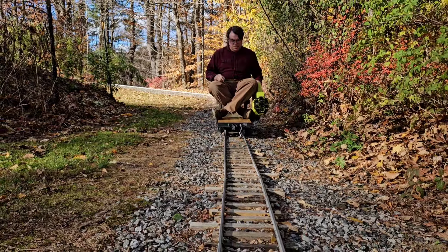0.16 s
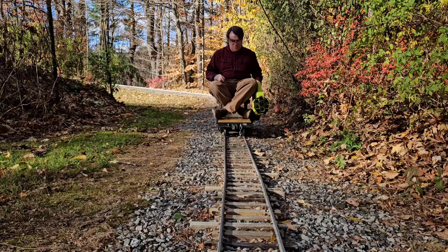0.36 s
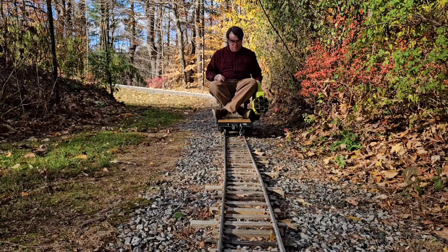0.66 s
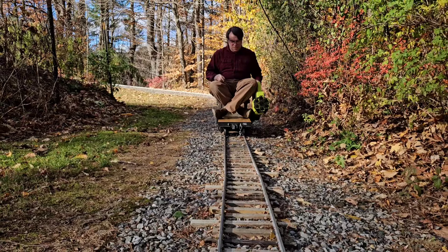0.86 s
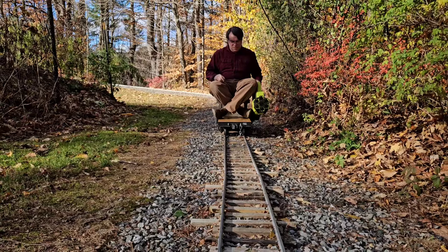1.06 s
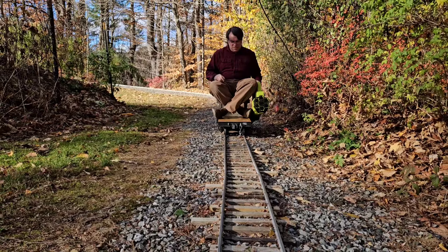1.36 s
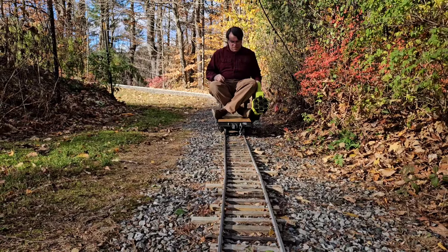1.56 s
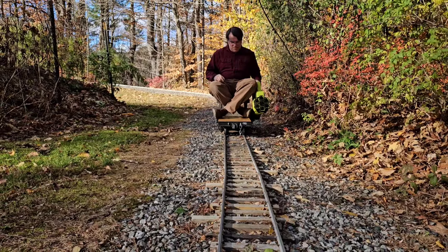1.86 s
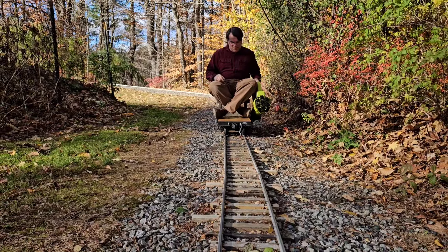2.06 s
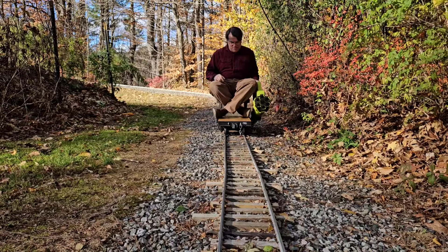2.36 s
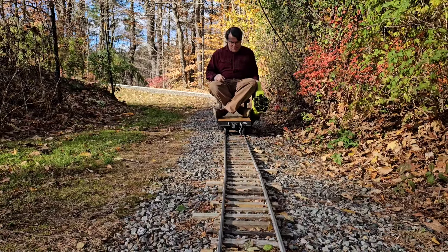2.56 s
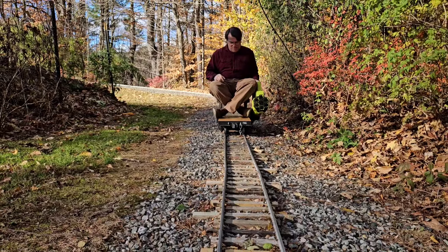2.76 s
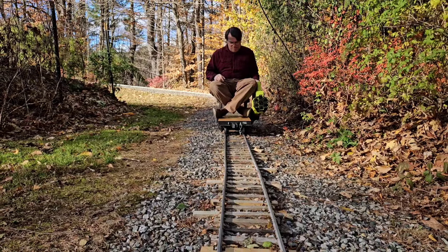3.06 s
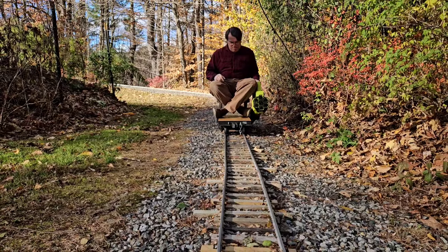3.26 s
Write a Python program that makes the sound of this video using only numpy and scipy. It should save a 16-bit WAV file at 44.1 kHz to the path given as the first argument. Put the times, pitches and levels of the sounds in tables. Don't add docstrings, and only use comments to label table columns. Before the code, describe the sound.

A battery leaf blower runs flat out from start to end, some metres away in open woods: a thin whine near 3.8 kHz, a hum near 345 Hz and broad rushing air. Light wind rumbles unevenly on the stereo microphone. Two wind pops hit the left near 1 s. From 2 to 2.4 s pitch sags slightly, air dulls, then recovers. A faint tick at 2.9 s precedes left-side thumps around 3 s; the blower continues to 3.4 s.

```python
import sys
import numpy as np
from scipy import signal
from scipy.fft import rfft, irfft
from scipy.io import wavfile
from scipy.ndimage import map_coordinates

SR = 44100
rng = np.random.default_rng(int(sys.argv[2]) if len(sys.argv) > 2 else 0)


def transcribe(signal):
    frames = np.atleast_2d(signal).T
    limited = np.clip(frames, -1, 1)
    pcm = np.round(limited * 32767).astype(np.int16)
    wavfile.write(sys.argv[1], SR, pcm)


def undo_db(level):
    steps = np.asarray(level, float) / 20
    return 10 ** steps


N = 149940
T = np.arange(N) / SR
F = np.arange(N // 2 + 1) * SR / N
SIDE = np.array([[1], [-1]])

# pitch_hz,
# level_db (per Hz)
AIR_SPECTRUM = [(140, -5), (260, -4.5), (340, 2), (450, 2), (500, -9.5), (640, -6.5), (740, -21),
                (930, -17),
                (1010, -9), (1300, -4.5), (1450, -10.5), (1900, -5), (2200, 0), (2500, -5), (3000, -6.5),
              (3650, -5.5),
                (4000, -9.5), (5200, -19), (7000, -23.5), (7500, -18), (7800, -23), (10000, -25),
              (11500, -23), (15500, -20.5)]
AIR_COLOUR = AIR_SPECTRUM
AIR_DB = -30


def level(x, db):
    return x * undo_db(db) / np.sqrt(np.mean(x ** 2))


def on_log(hz, table, column=1):
    rows = np.array(table, float)
    return np.interp(np.log(np.maximum(hz, 1)), np.log(rows[:, 0]), rows[:, column])


def walk(rate):
    points = rng.standard_normal(int(N / 64 * rate / 700) + 4)
    smooth = map_coordinates(points, [np.arange(N // 64 + 2) * rate / 700], mode="mirror")
    smooth = (smooth - smooth.mean()) / smooth.std()
    return np.interp(np.arange(N) / 64, np.arange(len(smooth)), smooth)


def bands(table, lo_hz, count, flicker_db, rate):
    spectrum = rfft(rng.standard_normal(N)) * undo_db(on_log(F, table))
    octave = np.log2(np.maximum(F, 1) / lo_hz)
    out = 0
    for k in range(count):
        window = np.cos(np.pi / 2 * np.clip(octave - k, -1, 1)) ** 2
        out = out + irfft(spectrum * window, N) * undo_db(flicker_db * walk(rate))
    return out


def above(hz):
    return 1 / (1 + (hz / (F + 1)) ** 4)


def wind_rumble():
    # start_s, level_db
    gusts = [(0, -42), (.1, -40), (.34, -38), (.46, -42), (.6, -43), (.79, -38), (.86, -57), (1.02, -50),
             (1.12, -43), (1.45, -45.5), (1.65, -39), (2, -41.5), (2.1, -46.5), (2.45, -38), (2.65, -50),
             (2.92, -55), (3.03, -49), (3.4, -47.5)]
    # pitch_hz, level_db (per Hz), left_over_right_db
    wind_colour = [(20, -9, 4), (35, -1, 0), (55.3, 6.5, -2), (90, -7.5, -5.5), (174, -4, 1),
                   (280, -14.5, 0), (442, -34.5, 4), (900, -27, 9)]
    gust = undo_db(np.interp(T, *np.array(gusts).T) + 4.5)
    ports = []
    for sign in (1, -1):
        colour = [(hz, db + sign * left_db / 2) for hz, db, left_db in wind_colour]
        rumble = bands(colour, 19.4, count=7, flicker_db=1.5, rate=14)
        ports.append(rumble * undo_db(3.5 * walk(9.95)))
    return level(np.array(ports), 0) * gust


def wind_pops():
    # start_s, peak_db (left), pitch_hz, right_share
    pops = [
        (.953, -16, 230, 0.072),
        (.998, -12.5, 230, 0.089),
        (2.956, -18, 150.3, .1),
        (2.9966, -8.5, 259.8, 0.043),
        (3.02, -14, 74, 0.13),
        (3.044, -11, 176, 0.046),
        (3.092, -19.5, 220, .1),
        (3.108, -23, 130, .1),
    ]
    rise_turns, fall_turns, rasp_s = 0.081, 0.79, 0.011
    rasp_band = signal.butter(2, [90, 380], "band", fs=SR, output="sos")
    rasp = level(signal.sosfilt(rasp_band, rng.standard_normal(N)), -16)
    out = np.zeros((2, N))
    for at, db, hz, right in pops:
        turns = (T - at) * hz
        shape = np.exp(-(turns / np.where(turns < 0, rise_turns, fall_turns)) ** 2)
        wake = rasp * np.exp(-((T - at) / rasp_s) ** 2)
        pop = np.cos(2 * np.pi * turns) * shape + wake
        out += undo_db(db) * pop * np.array([[1], [right]])
    return out


def grit_tick():
    start_s, pitch_hz, length_s = 2.9, 5200, 0.0015
    t = T - start_s
    return undo_db(-31) * np.sin(2 * np.pi * pitch_hz * t) * np.exp(-np.abs(t) / length_s) * (t > 0)


def shaft_speed():
    # start_s, pitch_hz
    speed = [(0, 3795), (.5, 3784), (1.1, 3786), (1.9, 3778), (1.97, 3744), (2.04, 3655), (2.12, 3587),
             (2.2, 3560), (2.29, 3528), (2.34, 3569), (2.39, 3707), (2.45, 3772), (2.55, 3775), (3.4, 3766)]
    blades = 11
    return np.interp(T, *np.array(speed).T) / blades


def rushing_air(shaft_hz):
    throb = 1 + 0.14 * np.sin(2 * np.pi * np.cumsum(shaft_hz) / SR)
    load = undo_db(-8 * (1 - shaft_hz / shaft_hz[0]) + 0.15 * walk(2.9))
    rush = bands(AIR_COLOUR, 97, count=9, flicker_db=0.68, rate=20)
    return load * throb * level(rush, AIR_DB)


def air_at_ports(source, shaft_hz):
    # pitch_hz, left_lead_radians
    port_leads = [(200, 0), (2500, -.15), (4100, -.6), (6300, -1.3), (8400, -3.2), (10300, -2.1),
                  (13000, -3.1), (15500, -3.9)]
    # pitch_hz, scattered_db, left_over_right_db
    scatter = [(200, -20, -0.5), (830, -5.5, 1), (1520, -16.5, -0.6), (3000, -10.5, 1.5), (6560, -4, 1),
               (7700, -8.5, 3), (8750, -8.5, -6), (10900, -10.5, 3.5), (15500, -14, 0)]
    lead = on_log(F, port_leads) * SIDE / 2
    tilt = undo_db(on_log(F, scatter, column=2) * SIDE / 2)
    echo_s = 0.00397 + 0.00004 * SIDE / 2
    echo = 1 + undo_db(-5.5) * above(2400) * np.exp(-2j * np.pi * F * echo_s)
    noise = rfft(rng.standard_normal((2, N))) * undo_db(on_log(F, AIR_COLOUR))
    scattered = level(irfft(noise, N), AIR_DB)
    direct = rfft(source) * echo * np.exp(1j * lead)
    rush = (direct + rfft(scattered) * undo_db(on_log(F, scatter))) * tilt
    treble_loss = undo_db(-32 * (1 - shaft_hz / shaft_hz[0])) - 1
    return irfft(rush, N) + treble_loss * irfft(rush * above(4700), N)


def rotor_tones(shaft_hz):
    orders = [1, 2, 3, 4, 5, 6, 8, 9, 11, 14, 16, 20, 21, 22]
    # level_db, flutter_db, sag_db (gained at the bottom of the sag),
    # drift_db (gained per s as the cart turns), left_lead_radians
    order_levels = [(-25.5, 0.47, -1, -0.03, 0.022), (-44.5, 0.5, -1, 0, 0.067),
                    (-37.5, 0.5, -15.5, 0, 0.39), (-43, 1, 5, 0.32, -0.2), (-46, 0, 3, -1.5, .05),
                    (-51.5, 4.5, -4, 0, -.1), (-53, -2, 0, -1, -.2), (-55, 4.5, 0, 0.5, -0.5),
                    (-36, 1.1, 0.5, 1.06, -0.55), (-65, 3., 0, 0.5, -.8), (-63, 3., -2, 0.5, -0.68),
                    (-74, 2, 0, 0.5, -1.5), (-65, 6, -2, 0.5, -1.3), (-58, 2.5, 2.5, 1, -2.)]
    sag = np.clip((shaft_hz[-1] - shaft_hz) / (shaft_hz[-1] - shaft_hz.min()), 0, 1)
    wobbling_hz = shaft_hz * (1 + 0.00055 * walk(49.85))
    turn = 2 * np.pi * np.cumsum(wobbling_hz) / SR
    out = 0
    for order, (db, flutter_db, sag_db, drift_db, lead) in zip(orders, order_levels):
        gain = undo_db(db + sag_db * sag + drift_db * T + flutter_db * walk(40.01))
        phase = order * turn + rng.uniform(0, 2 * np.pi)
        out = out + np.sqrt(2) * gain * np.sin(phase + lead * SIDE / 2)
    return out


def scene():
    shaft_hz = shaft_speed()
    wind = wind_rumble() + wind_pops()
    air = air_at_ports(rushing_air(shaft_hz) + grit_tick(), shaft_hz)
    return wind + air + rotor_tones(shaft_hz)


def top_cut(x):
    return signal.sosfilt(signal.butter(12, 15900, fs=SR, output="sos"), x)


def record(dry):
    low_pass = signal.ellip(10, 0.2, 80, 15740, fs=SR, output="sos")
    mix = signal.sosfilt(low_pass, dry)
    return top_cut(mix)


dry = scene()
out = record(dry)
transcribe(out)
```